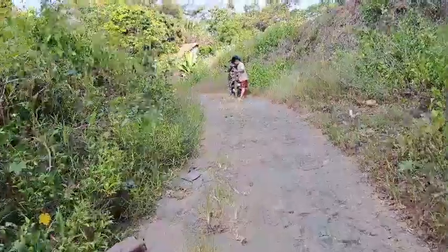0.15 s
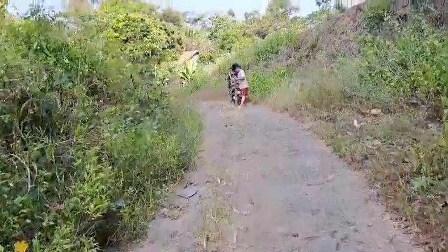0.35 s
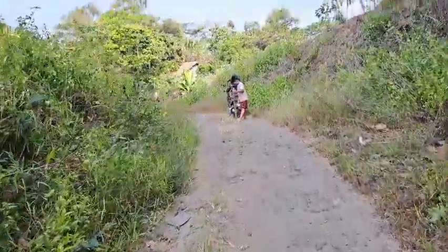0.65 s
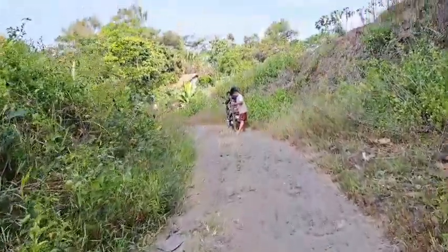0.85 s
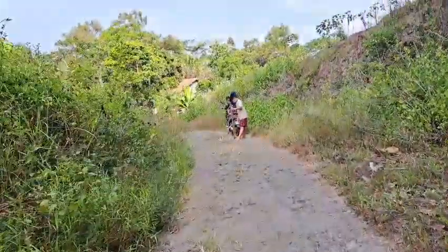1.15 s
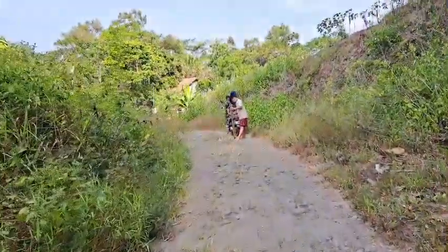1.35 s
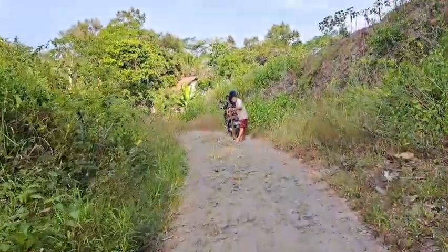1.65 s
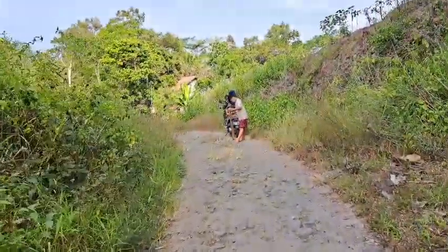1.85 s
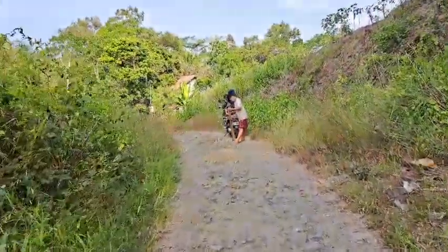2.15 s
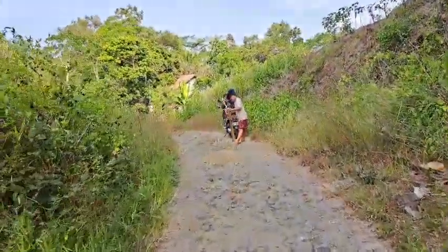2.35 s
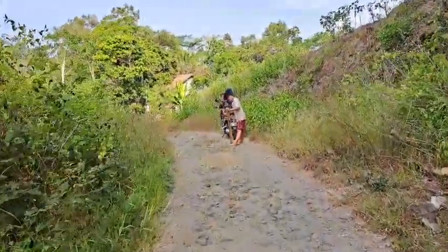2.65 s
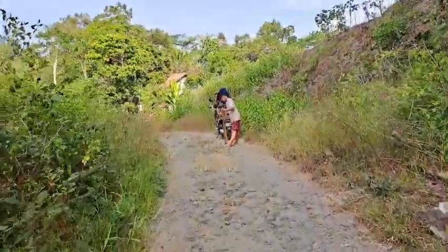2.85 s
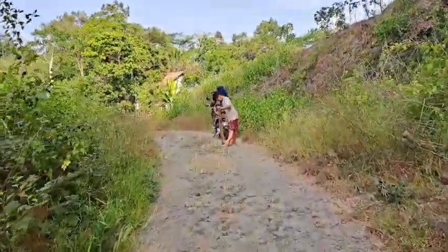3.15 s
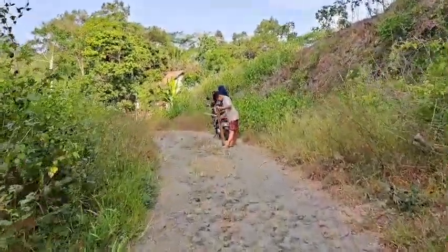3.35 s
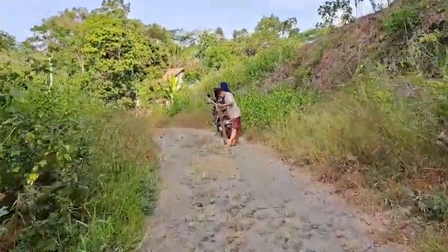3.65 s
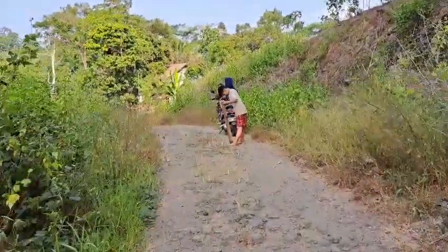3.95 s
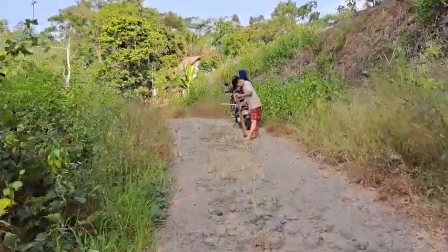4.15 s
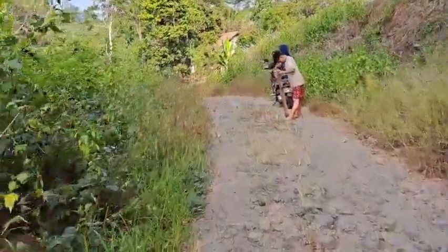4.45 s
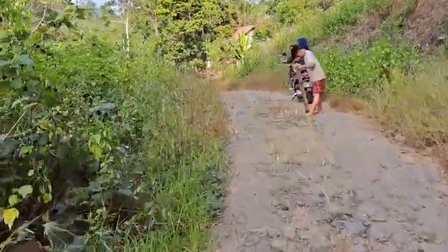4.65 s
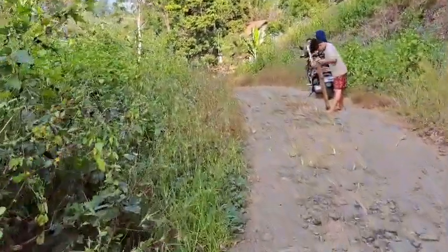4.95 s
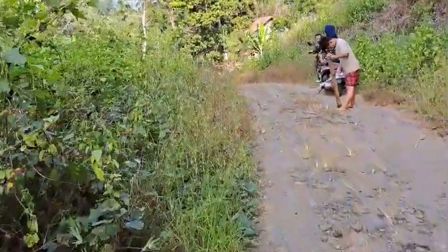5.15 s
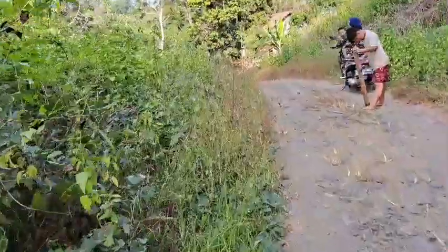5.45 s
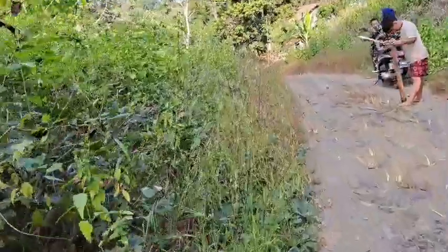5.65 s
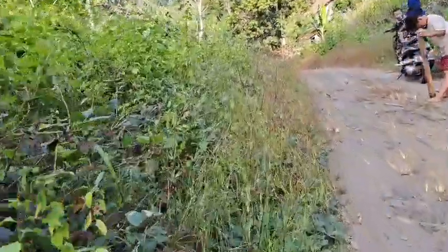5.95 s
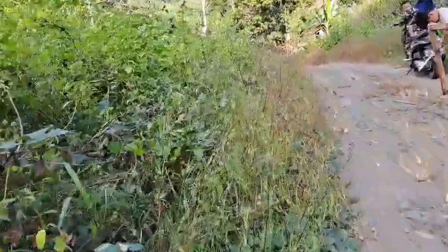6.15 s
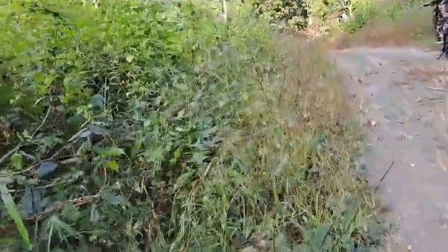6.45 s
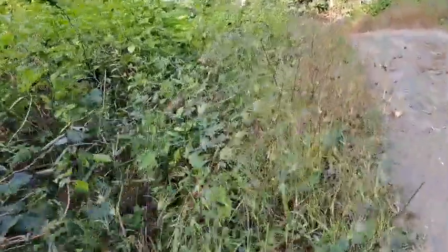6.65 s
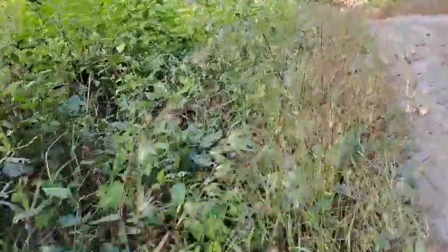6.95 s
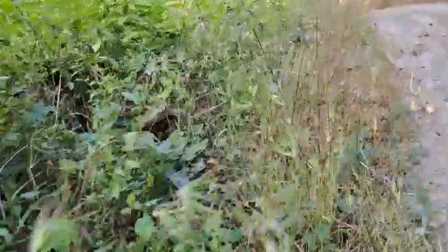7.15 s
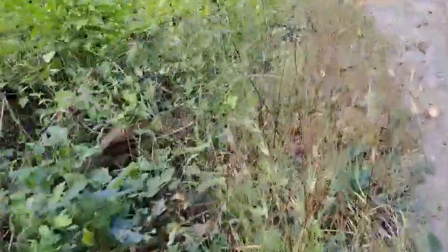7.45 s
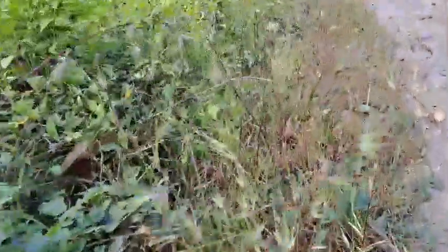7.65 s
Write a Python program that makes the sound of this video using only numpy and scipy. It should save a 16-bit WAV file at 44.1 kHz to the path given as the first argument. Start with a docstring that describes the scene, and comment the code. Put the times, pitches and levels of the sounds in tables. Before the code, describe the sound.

Some metres up a stony path in open country, a blade chops a hollow bamboo pole about a dozen times. Each blow cracks, rings briefly and scatters back off the bushes and an earth bank. Light wind rumbles on the moving microphone, most strongly near the middle, over a faint wash of air. Toward the end, grit and dry stalks tick close by.

```python
"""A stony path in open country, some metres from a blade chopping a hollow bamboo pole; two microphone
ports on a walking, turning camera. It opens on a wash of air and the echo of a blow just struck.
Thirteen more follow: fibres crack, the pole rings briefly, the earth bank and bushes scatter it back.
Light wind buffets each port, hardest about three seconds in. Late on, as the camera turns away,
grit and dry stalks tick more often near the walker."""
import sys
import numpy as np
from scipy import signal
from scipy.fft import rfft, irfft
from scipy.io import wavfile
from scipy.ndimage import uniform_filter1d

SR = 44100
rng = np.random.default_rng(int(sys.argv[2]) if len(sys.argv) > 2 else 0)


def to_wav(sig):
    """Store sig (one row per channel, or 1-D mono) as 16-bit WAV at the path in sys.argv[1].

    Samples outside -1..1 are clipped; the rate is SR.
    """
    pcm = np.clip(np.atleast_2d(sig), -1, 1) * 32767
    pcm = np.round(pcm).astype(np.int16)
    wavfile.write(sys.argv[1], SR, pcm.T)  # frames by channels


N = 344409
LEAD = 8192  # samples of run-up before time zero


def gain_of(db):
    """Decibels to a factor."""
    return 10 ** (np.asarray(db) / 20)


def unit_rms(x):
    """Scales to rms 1."""
    return x / np.sqrt(np.mean(x ** 2) + 1e-20)


def wobble(length, span):
    """Random drift of rms 1, smoothed over span points."""
    return unit_rms(uniform_filter1d(rng.standard_normal(length), span))


def at_hz(points, hz):
    """Looks up a table on a log-frequency axis."""
    knots_hz, values = np.transpose(points)
    return np.interp(np.log(hz + 1), np.log(knots_hz + 1), values)


def add(mix, start_s, sound):
    """Mixes a sound into a track that begins with the run-up."""
    part = mix[..., LEAD + round(start_s * SR):][..., :sound.shape[-1]]
    part += sound[..., :part.shape[-1]]


def coloured(x, points):
    """Filters by a dB spectrum."""
    hz = np.fft.rfftfreq(x.shape[-1], 1 / SR)
    return irfft(rfft(x) * gain_of(at_hz(points, hz)), x.shape[-1])


def swell(t, start_s, hold_s, rise_s, fall_s):
    """Attack, hold and release in dB from the top; rise_s and fall_s each span 10 dB."""
    return -10 * (np.maximum(start_s - t, 0) / rise_s + np.maximum(t - start_s - hold_s, 0) / fall_s)


def diffuse(shape, size, length, spacing_m=0.16):
    """Noise from all round, alike at both ports in the bass; shape(t, hz) is its magnitude."""
    hz = np.fft.rfftfreq(size, 1 / SR)[:, None]
    t = np.arange(length * 4 // size + 5) * size / 4 / SR
    a, b, c, d = rng.standard_normal((len(t), len(hz), 4)).T
    coherence = np.sinc(2 * hz * spacing_m / 343)
    left = a + 1j * b
    right = coherence * left + np.sqrt(1 - coherence ** 2) * (c + 1j * d)
    spectra = np.array([left, right]) * shape(t, hz)
    return signal.istft(spectra, nperseg=size, noverlap=size * 3 // 4)[1][:, :length]


def air():
    """Far wash of open country, falling as the camera turns to the bushes."""
    # Country air and hiss: frequency_hz, level_db
    spectrum = [(24, -45), (40, -11.5), (117, -9), (213, -7), (301, -9), (653, -10.5), (1160, -17),
                (1280, -16), (2220, -17), (3220, -19.5), (6810, -23.5), (15500, -27.5)]
    # Drift of the wash: time_s, level_db
    drift = [(0, -52.5), (1.6, -54), (3.6, -55), (5.2, -58), (7.35, -59), (7.81, -56.5)]
    wash = unit_rms(diffuse(lambda t, hz: gain_of(at_hz(spectrum, hz)), 1024, N))
    port_db = np.array([[3.], [4.]])
    return wash * gain_of(np.interp(np.arange(N) / SR, *np.transpose(drift)) + port_db)


def wind():
    """Low turbulence and a few thuds, unrelated in the two ports; stronger gusts reach higher."""
    # Mean breeze at the ports: time_s, level_db
    breeze = [(0, -54), (.6, -63), (1.2, -45), (1.5, -66.5), (2.1, -48.5), (2.5, -52.5), (3.4, -47.5),
              (3.9, -49), (4.3, -54), (5.05, -62.5), (5.35, -50), (6, -65.5), (7.2, -66), (7.81, -53)]
    # Low bumps at the ports, wind buffets and thuds that come with the blows:
    # start_s, hold_s, level_db, left_minus_right_db
    bumps = [(0.038, 0.065, -53.5, -16), (0.244, 0.1, -48.5, 6), (0.356, 0.071, -42, -3),
             (0.699, 0.095, -42, 0), (0.91, 0.07, -34, 0.5), (1.068, 0.076, -49, -16.5),
             (1.188, 0.033, -38.5, -3), (1.26, 0.043, -43.5, 0), (1.54, 0.035, -50, 2),
             (1.97, .05, -47, -9), (2.064, 0.033, -43, 0), (2.253, 0.032, -48, 0), (2.597, 0.094, -48, 19),
             (2.697, .05, -36, 17.5), (2.789, 0.066, -31, 5.5), (2.87, 0.071, -41, -16.5),
             (2.939, 0.057, -31.5, -6.5), (3.004, 0.081, -46.5, -14), (3.078, 0.045, -51, 20),
             (3.197, 0.04, -27, 0), (3.277, 0.052, -35, -1), (3.36, 0.052, -33, -1),
             (3.426, 0.03, -43.5, -23), (3.491, 0.054, -33, -5), (3.578, 0.024, -33, 1),
             (3.742, 0.044, -45.5, 3), (3.911, 0.057, -37, 3), (3.98, 0.05, -32, -2),
             (4.093, 0.06, -51, -17), (4.164, 0.024, -43, 0), (5.367, .06, -43, 0), (5.63, 0.047, -53, -7),
             (5.843, 0.068, -50, -1), (6.025, .03, -47, -5), (6.764, 0.037, -49, -4),
             (7.03, 0.064, -52, -5), (7.546, .05, -47.5, -3), (7.639, 0.036, -44.5, 0),
             (7.722, 0.06, -45.5, -2)]
    # Rumble at full gust: frequency_hz, level_db
    spectrum = [(20, -6.5), (45, -3), (75, 0.5), (130, -3.5), (250, -11.5), (500, -29.5), (900, -47.5)]
    lumpy_db, flutter_db, full_gust_db = 4.5, 4.5, -35.5
    hz = np.fft.rfftfreq(1024, 1 / SR)[:, None]
    t = np.arange(N // 256 + 5) * 256 / SR
    ports = []
    for side in (.5, -.5):
        power = gain_of(np.interp(t, *np.transpose(breeze)) + lumpy_db * wobble(len(t), 8)) ** 2
        for start_s, hold_s, db, pan_db in bumps:
            swell_db = swell(t, start_s, hold_s, rise_s=0.0089, fall_s=0.013)
            power += gain_of(db + side * pan_db + swell_db) ** 2
        gust_db = 10 * np.log10(power)
        squeeze = gain_of(0.33 * (full_gust_db - gust_db))  # slow air makes larger, lower eddies
        real, imag = rng.standard_normal((len(t), len(hz), 2)).T
        spectra = (real + 1j * imag) * gain_of(at_hz(spectrum, hz * squeeze))
        spectra /= np.linalg.norm(spectra, axis=0)
        rumble = signal.istft(spectra, nperseg=1024, noverlap=768)[1][:N]
        level_db = np.interp(np.arange(N) / SR, t, gust_db) + 3.5 + flutter_db * wobble(N, 700)
        ports.append(gain_of(uniform_filter1d(level_db, size=200)) * rumble)
    return np.array(ports)


def rustle():
    """Stalks brushed beside the walker: dense uneven clicks under each stroke."""
    # Strokes through the stalks: peak_s, level_db
    strokes = [(.35, -47), (2.4, -58), (5.83, -55), (7.57, -60), (7.64, -47), (7.78, -73)]
    # Colour of dry stalks: frequency_hz, level_db
    spectrum = [(410, -21), (700, 0), (965, 1), (1250, -6.5), (2680, -3), (6170, -22), (12000, -54),
                (15600, -58), (22000, -120)]
    clicks_per_s = 5000
    t = np.arange(N) / SR
    level = sum(gain_of(db + swell(t, peak_s, 0, rise_s=0.032, fall_s=0.036)) for peak_s, db in strokes)
    clicks = rng.standard_normal((2, N)) * gain_of(3.0 * np.minimum(rng.exponential(1, N), 3))
    clicks *= rng.random(N) < clicks_per_s / SR
    return level * unit_rms(coloured(clicks, spectrum))


def ticks():
    """Grit and dry stalks snap close by: a few milliseconds of noise around one pitch."""
    # Snaps on the path: start_s, level_db, pitch_hz, width_hz, left_minus_right_db
    snaps = [(1.469, -43, 2400, 2000, -1), (2.435, -42, 3500, 4000, 0), (2.461, -41, 3130, 1185, -3),
             (3.696, -49, 4800, 1193, -4), (3.741, -41, 5100, 1500, -6), (4.401, -48, 2160, 2500, 2),
             (5.821, -43, 5000, 8050, -2), (5.829, -43, 3500, 6000, -14), (5.862, -47, 2450, 3000, -4),
             (5.901, -41, 2750, 700, -2), (5.915, -39, 1740, 1800, -8), (6.379, -36, 4430, 5000, -9),
             (6.411, -45, 1770, 1020, -10), (7.219, -45, 1500, 1500, 1), (7.568, -43, 3970, 4000, -5),
             (7.587, -43, 2270, 2000, 5), (7.623, -30.5, 2200, 2350, -11), (7.632, -37, 2300, 3000, -6),
             (7.651, -45, 2800, 1500, -8), (7.72, -43.5, 1200, 1400, -13), (7.774, -33.5, 4460, 6000, -6),
             (7.7745, -35, 1150, 1200, -3)]
    out = np.zeros((2, LEAD + N))
    t = np.arange(600) / SR
    for start_s, db, hz, width_hz, pan_db in snaps:
        band = signal.iirpeak(hz, hz / width_hz, SR)
        noise = signal.lfilter(*band, rng.standard_normal(len(t)))
        snap = signal.lfilter(*band, noise) * np.exp(-t / 0.0019)
        port_gain = gain_of(db + np.array([[pan_db / 2], [-pan_db / 2]]))
        add(out, start_s, port_gain * snap / abs(snap).max())
    return out[:, LEAD:]


def scatter(sound):
    """Leaves and banks return a patchy haze that swells, then dies by band; the pole's notes stay in it."""
    # Colour of the haze: frequency_hz, level_db
    spectrum = [(200, -41), (260, 8.5), (600, -18), (1000, -5), (1600, -7), (1950, -4.5), (2350, -5.5),
                (2800, -5), (4500, -5), (7500, -12.5), (10000, -17.5), (16000, -22)]
    # Decay among the bushes: frequency_hz, t60_s
    decay = [(250, 0.37), (660, 0.65), (1740, 0.57), (4600, 0.48), (10000, 0.43)]
    ring_hz, ring_width_hz, ring_share, notes_t60_s = 2300, 260, 0.67, 0.32
    length = 28000
    t = np.arange(length) / SR
    blow_db = 10 * np.log10(uniform_filter1d(abs(rfft(sound)) ** 2, size=200)[::16, None] + 1e-12)

    def bushes(t, hz):
        """Each bush answers at its own moment and in its own band."""
        patches = uniform_filter1d(rng.standard_normal((len(t), len(hz))).T, size=2, axis=0)
        patches = unit_rms(uniform_filter1d(patches, size=14, axis=1))
        return gain_of(at_hz(spectrum, hz) + 0.19 * blow_db + 2.35 * patches - 60 * t / at_hz(decay, hz))

    haze = diffuse(bushes, 512, length)
    haze += ring_share * signal.lfilter(*signal.iirpeak(ring_hz, ring_hz / ring_width_hz, SR), haze)
    haze *= (1 - np.exp(-t / 0.004)) * gain_of(1.3 * wobble(length, 300))
    dulled = signal.sosfilt(signal.butter(4, 3000, fs=SR, output="sos"), sound)
    paths = diffuse(lambda t, hz: gain_of(-60 * t / notes_t60_s), 512, length)
    notes = signal.fftconvolve(dulled[None], paths / np.linalg.norm(paths[0]), axes=1)[:, :length]
    return haze * np.linalg.norm(sound) / np.linalg.norm(haze[0]) + gain_of(-4.0) * notes


def path_and_bank(sound):
    """The direct sound, its bounce off the path and slaps off the earth bank, which absorbs treble."""
    # Slaps off the bank: delay_s, level_db
    slaps = [(.0045, -11), (0.01, -7.5), (.019, -20), (0.028, -31.5)]
    response = np.zeros(2048)
    for delay_s, db in slaps:
        response[round(delay_s * SR)] = gain_of(db)
    response = signal.lfilter(*signal.butter(1, 2000, fs=SR), response)
    response[0] = 1
    response[round(.0013 * SR)] = gain_of(-29)  # off the path
    return np.convolve(sound, response)[:len(sound)]


def at_ports(sound, time_s, margin_s):
    """A plane wave is duller at the left port, and arrives later there as the camera turns away."""
    # Turn of the camera: time_s, left_delay_ms
    turn = [(0, 0), (1.2, .02), (3.2, -.04), (4, 0), (4.7, .09), (5.5, .16), (6.8, .27), (7.8, .27)]
    # Shading of the left port: frequency_hz, left_minus_right_db
    shade = [(300, 0), (2000, -.3), (4000, -2), (9000, -2.5)]
    hz = np.fft.rfftfreq(len(sound), 1 / SR)
    late_s = np.interp(time_s, *np.transpose(turn)) / 1000
    left = gain_of(at_hz(shade, hz) / 2) * np.exp(-2j * np.pi * hz * (late_s + margin_s))
    right = gain_of(-at_hz(shade, hz) / 2) * np.exp(-2j * np.pi * hz * margin_s)
    return irfft(rfft(sound) * np.array([left, right]), len(sound))


def pole_ring(t, column_db, low_db, low_hz, middle_db, high_db, high_hz, focus, looseness):
    """The blade's push jolts the pole and rings its modes; the place struck favours some of them."""
    # Mode families (air column; low, middle, high wall), each with rows of: pitch_hz, level_db, t60_s
    families = [
        [(279.9, -0.5, 0.11), (311, 0.5, 0.057)],
        [(352, 6.5, 0.066), (555.8, 0.5, 0.08), (632, -8.5, 0.097)],
        [(820, -11, .12), (959.7, 1.5, 0.081)],
        [(1250, -5.5, .09), (1446, -2, 0.024), (1700, 3, 0.03), (1815, -2.5, 0.06), (2270, -7.5, 0.075),
         (2860, 3, 0.044), (3500, -22, 0.032), (4100, 8, 0.028)],
    ]
    jolt_hz, jolt_t60_s = 395.4, 0.032
    jolt_db = low_db + 7.1 - .2 * focus  # a glancing, selective tap hardly moves the pole
    jolt = gain_of(jolt_db - 60 * t / jolt_t60_s) * (1 - np.exp(-t / 0.0072))
    ring = jolt * np.sin(2 * np.pi * jolt_hz * t)
    levels_db = (column_db, low_db, middle_db, high_db)
    for modes, family_db, favoured_hz in zip(families, levels_db, (None, low_hz, None, high_hz)):
        for hz, mode_db, t60_s in modes:
            loss_db = focus * abs(np.log2(hz / favoured_hz)) if favoured_hz else 0
            detune = 1 + 0.0056 * rng.standard_normal()  # grip and notch change from blow to blow
            rise = 1 - np.exp(-t / (0.43 / hz + .0007))  # part of a cycle plus the blade's push
            fall = gain_of(family_db + mode_db - loss_db - 60 * t / (t60_s * looseness))
            ring += rise * fall * np.sin(2 * np.pi * hz * detune * t)
    return ring


def crack(t, notch_hz, edge_db, focus):
    """Fibres snap for a few milliseconds, the notch's cut lips ring and steel ticks on the hard skin."""
    # Snapping fibres: frequency_hz, level_db
    fibre_spectrum = [(1000, -8), (1800, -3), (2600, -9.5), (4500, -2.5), (7000, -6.5), (8800, -13.5),
                      (11000, -62)]
    # Tick of the blade's edge: frequency_hz, level_db
    edge_spectrum = [(7000, -47), (9000, 4.5), (12500, 6), (16000, -10)]
    notch_width_hz, notch_share = 350, 0.028 * min(focus, 45)
    fibre_noise, edge_noise = rng.standard_normal((2, len(t)))
    burst = (t / 0.0023) * np.exp(1 - t / 0.0011)
    burst += 0.25 * np.exp(-t / 0.0084) * (1 - np.exp(-t / 0.0024))
    fibres = unit_rms(burst * coloured(fibre_noise, fibre_spectrum))
    lips = signal.lfilter(*signal.iirpeak(notch_hz, notch_hz / notch_width_hz, SR), burst * fibre_noise)
    wood = unit_rms(fibres + notch_share * unit_rms(lips))
    edge = unit_rms(burst * coloured(edge_noise, edge_spectrum))
    return gain_of(-25.0) * wood + gain_of(edge_db - 21.5) * edge


def chopping():
    """Blows on the bamboo some metres up the path, each with its reflections and scattered tail."""
    # Blade strokes: start_s, level_db, notch_hz, edge_db, column_db, low_db, low_hz, middle_db, high_db,
    # high_hz, focus_db_per_octave, looseness (of the grip, a factor on ring time), haze_db
    blows = [(-.12, -3.5, 2630, -25, -10, -7, 550, -6, -12, 2370, 20, 1.57, -13.5),
             (.6956, -6, 6800, -37, -21, -5, 510, -9.5, -12.5, 1850, 23, 0.95, -11.5),
             (1.2146, -6, 3030, -14.5, -18.5, -4, 497, -6, -11, 1800, 19, 0.83, -11.5),
             (1.5033, -14.5, 3930, -31, -21.5, -21.5, 546, -13, -3, 1540, 35, 0.89, -10.5),
             (1.9978, -3, 4060, -22, -16, -9.5, 560, -11.5, -18, 1970, 18, 0.78, -11),
             (2.6965, -5.5, 3770, -21, -22.5, -6.5, 518, -13, -17, 2270, 16, 0.85, -10),
             (3.1833, -4, 2990, -10.5, -20, -9, 557, -14.5, -21, 1740, 21.5, 0.71, -9.5),
             (3.46, -15, 7100, -19, -40, -7.5, 546, -27, -12.5, 1470, 84, 1.9, -18.5),
             (3.9754, -3.5, 3600, -19, -13, -11, 560, -13, -15, 1510, 23.5, 0.8, -8.5),
             (4.6856, -4.5, 3150, -21, -16.5, -10, 547, -10.5, -10, 1700, 19.5, 0.71, -11),
             (5.228, -7, 4260, -13.5, -14, -12.5, 550, -9, -7.5, 1920, 14.5, 1.16, -9.5),
             (5.5126, -9, 3960, -24, -19.5, -25.5, 557, -18, -2.5, 1545, 48, 1.06, -16),
             (6.0267, -6, 3760, -21, -18.5, -20, 557, -20, -19.5, 1980, 18.5, 1.72, -7),
             (6.767, -2.5, 2980, -18.5, -21.5, -20, 560, -17, -8.5, 1330, 22, 1.2, -13.5)]
    margin_s = 0.001  # lets the left port be early as well as late
    out = np.zeros((2, LEAD + N))
    t = np.arange(8192) / SR
    for start_s, db, notch_hz, edge_db, *mode_balance, focus, looseness, haze_db in blows:
        ring = pole_ring(t, *mode_balance, focus, looseness)
        blow = gain_of(db) * (gain_of(4.5) * ring + crack(t, notch_hz, edge_db, focus))
        add(out, start_s - margin_s, at_ports(path_and_bank(blow), start_s, margin_s))
        add(out, start_s, gain_of(haze_db) * scatter(blow))
    no_bass = signal.cheby1(8, 1, 258, "high", fs=SR, output="sos")  # a thin pole radiates no bass
    return signal.sosfilt(no_bass, out)[:, LEAD:]


def scene():
    """All sources at the camera's two ports."""
    return chopping() + ticks() + rustle() + wind() + air()


def record(dry):
    """Microphone low cut and clipping, then a low-pass removing treble above 16 kHz."""
    # Microphone response: frequency_hz, gain_db
    response = [(15, -27), (30, -17), (45, 6), (65, 2), (100, 1)]
    clipped = np.clip(coloured(dry, response), -1, 1)
    low_pass = signal.firwin(511, 16000, window=("kaiser", 9), fs=SR)
    return signal.oaconvolve(clipped, low_pass[None], "same", axes=1)


dry = scene()
out = record(dry)
to_wav(out)
```